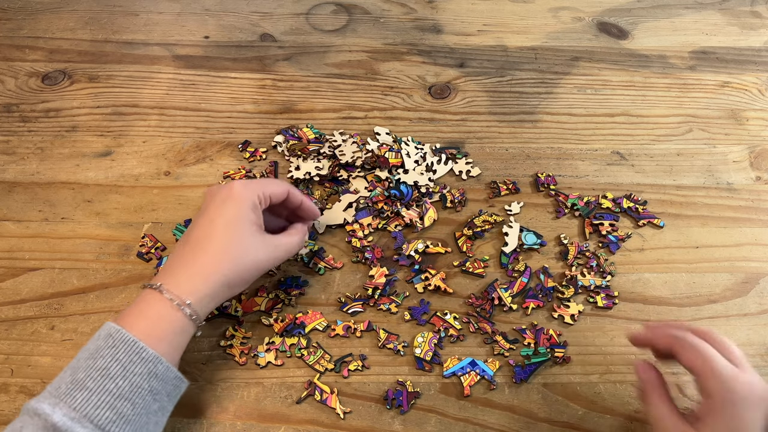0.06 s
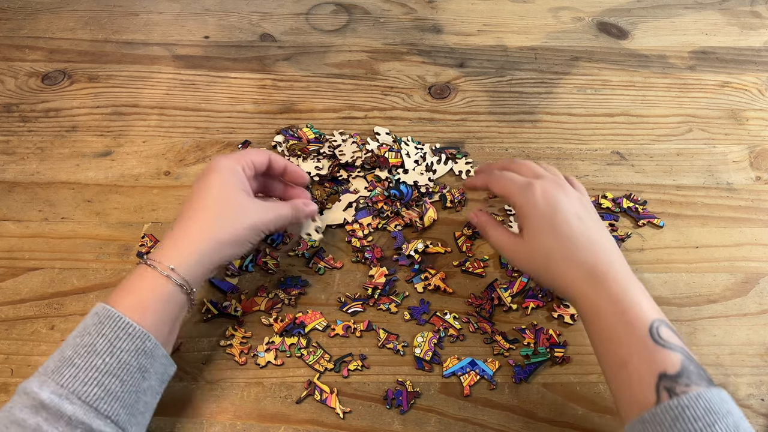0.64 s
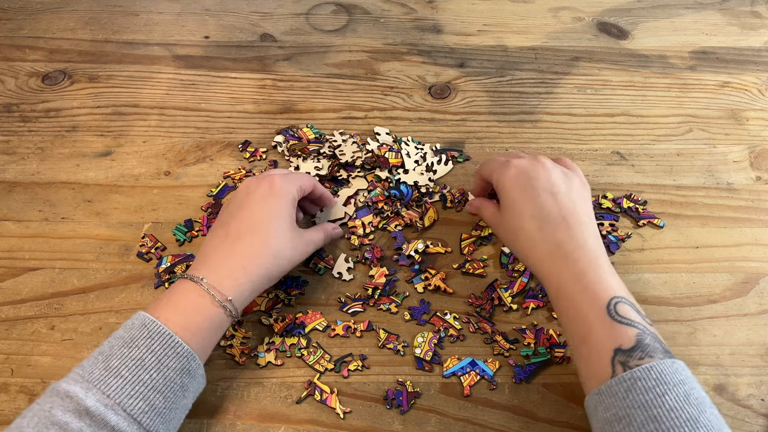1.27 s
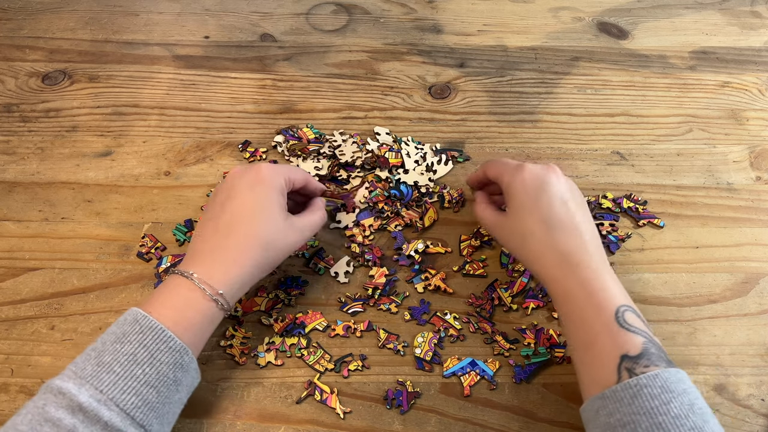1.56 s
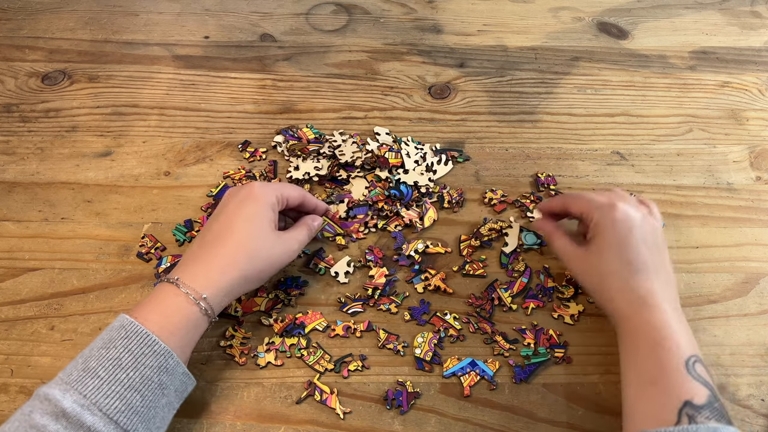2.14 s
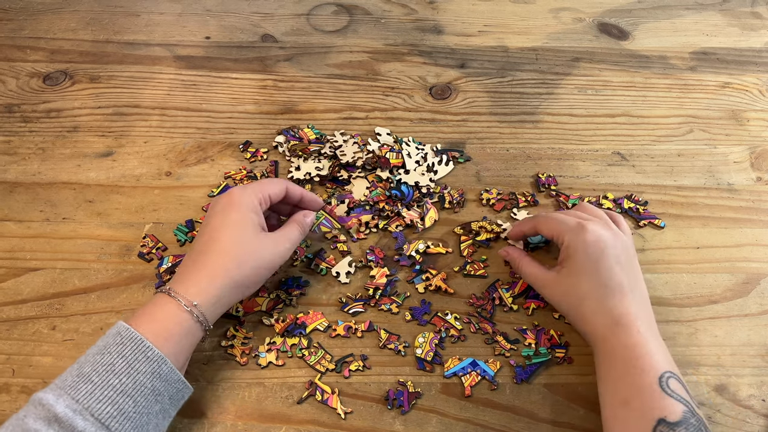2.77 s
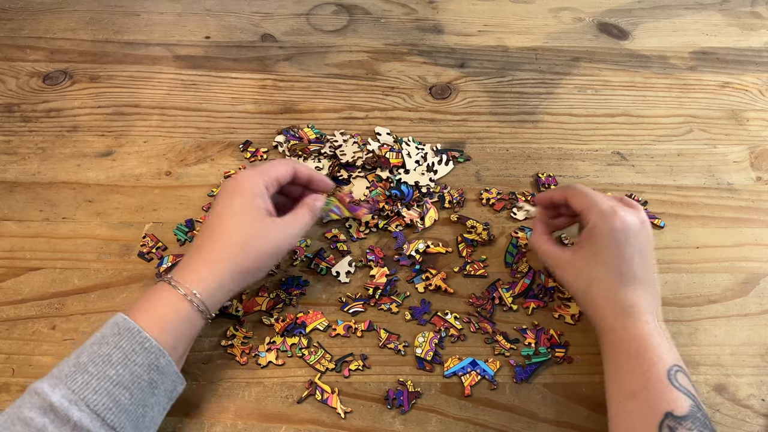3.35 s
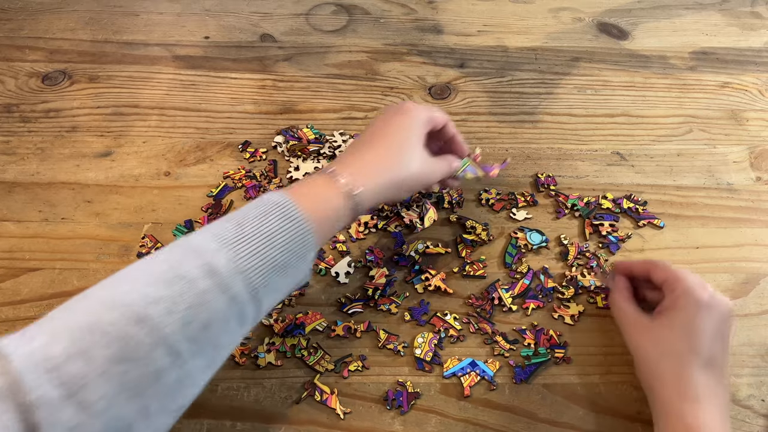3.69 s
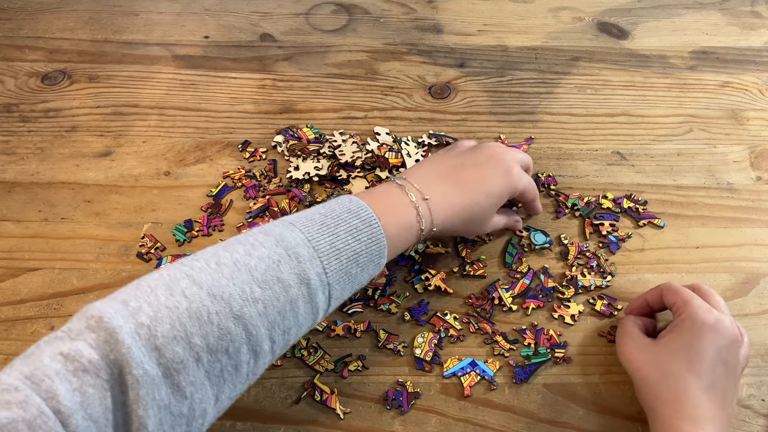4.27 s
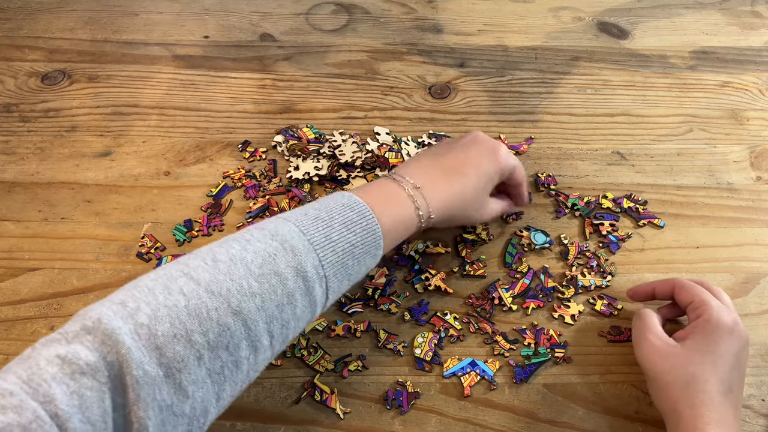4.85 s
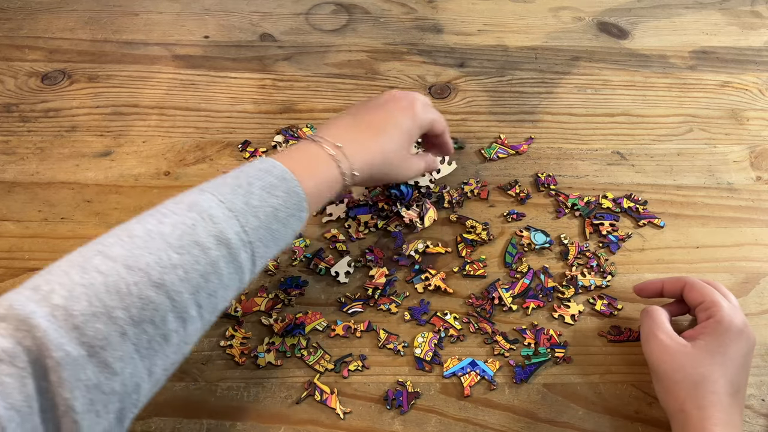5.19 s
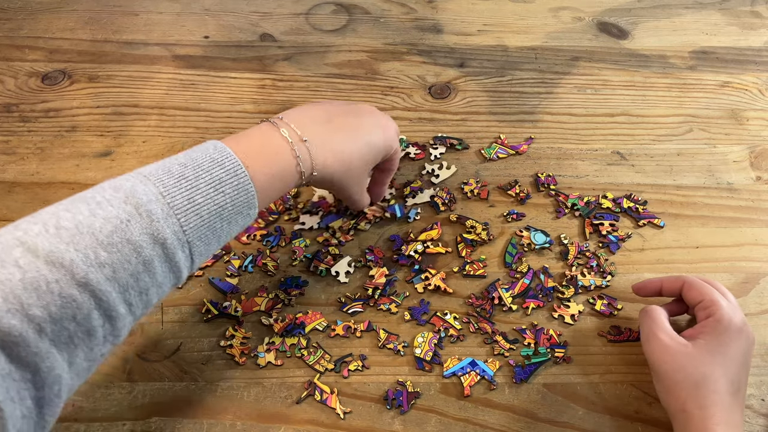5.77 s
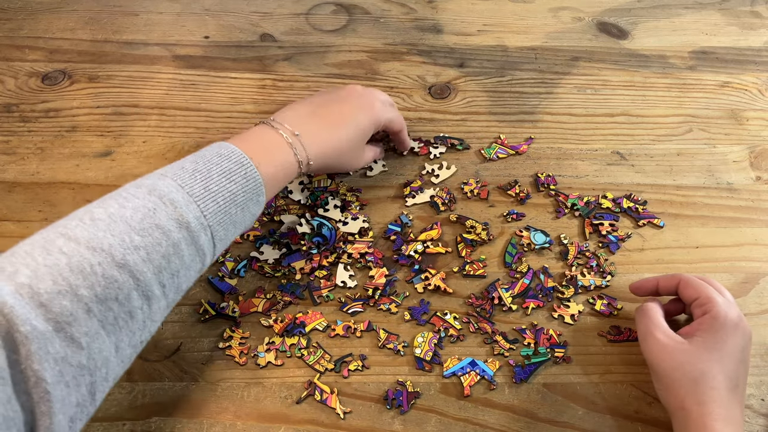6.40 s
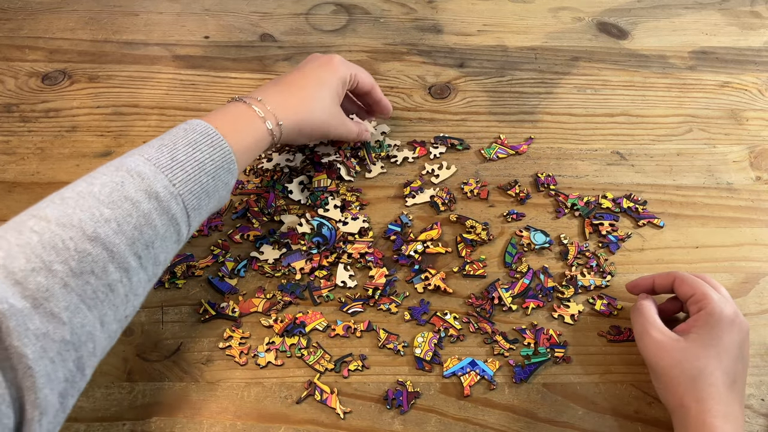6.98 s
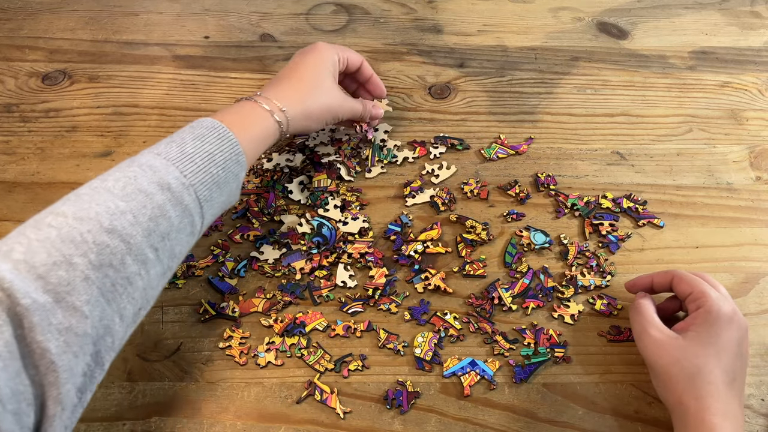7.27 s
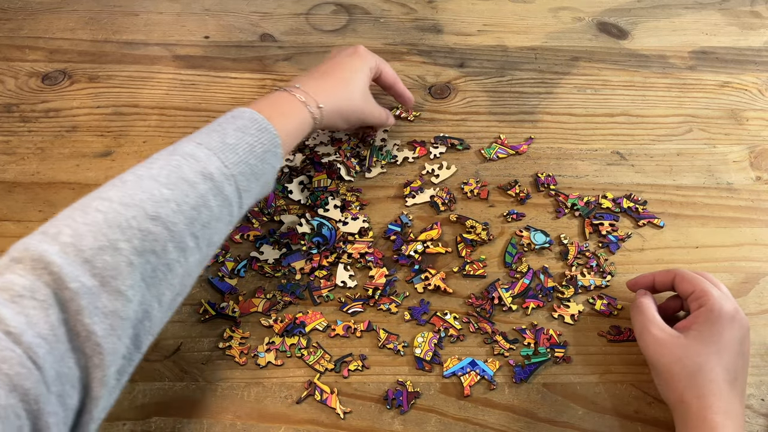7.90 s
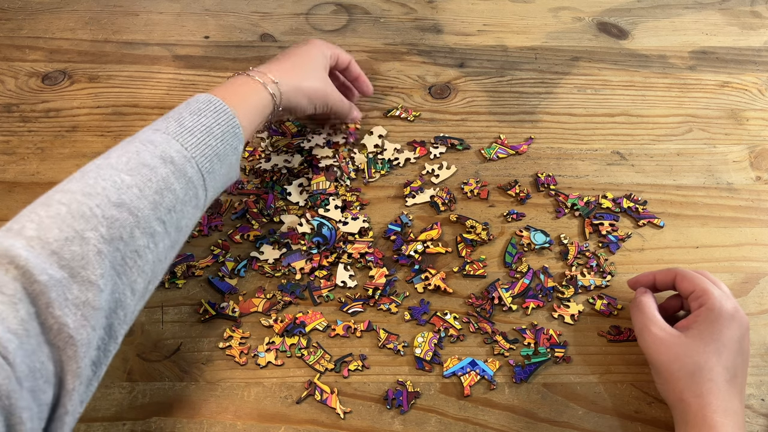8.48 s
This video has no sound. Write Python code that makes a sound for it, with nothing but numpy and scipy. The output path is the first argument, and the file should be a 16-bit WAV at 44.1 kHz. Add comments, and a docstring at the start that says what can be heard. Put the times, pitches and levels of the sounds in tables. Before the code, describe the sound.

Small wooden jigsaw pieces are sorted by hand on a wooden table. A soft sleeve brush opens, followed by dull hand thuds. From about 0.8 to 1.8 seconds the pieces click, ring briefly and scrape as they are pushed. Between 1.8 and 4.4 seconds a sleeve and hand rub across the tabletop, strongest after 3 seconds, with a sharp cluster of clacks near 4. A few faint ringing knocks sound in the background during the first 3.4 seconds. The busiest clattering and gritty sliding comes from 5.3 to 6.4 seconds, with the sharpest click around 5.4. Irregular clicks and short slides continue until about 8.7 seconds. Soft, low thuds of the hands recur throughout and reach the microphone mostly direct. A chain bracelet tinkles very faintly now and then, mainly in the last two seconds. The room is fairly live, with a quiet low hum.

```python
"""A sleeve brushes a wooden table, then small plywood jigsaw pieces click as fingers sort them.
The pieces ring when they collide, knock on the tabletop and scrape in stick-slip as they are pushed.
A chain bracelet tinkles with the wrist; soft thuds of the hands reach the microphone mostly direct.
The room is fairly live, with a low hum and a few faint ringing knocks in the background."""
import sys
import numpy as np
from scipy import signal
from scipy.fft import rfft, irfft
from scipy.io import wavfile

SR = 44100
rng = np.random.default_rng(int(sys.argv[2]) if len(sys.argv) > 2 else 0)


def wrap_up_sound(samples):
    """Save the sound to the file named by the first command line argument, as 16-bit audio."""
    columns = np.atleast_2d(samples).T
    # keep every value between -1 and 1, then stretch to whole-number steps
    tamed = np.clip(columns, -1, 1)
    steps = np.round(tamed * 32767).astype(np.int16)
    wavfile.write(sys.argv[1], SR, steps)


N = 385434
TIME = np.arange(N) / SR
HIT_TIME = TIME[:SR // 8]   # seconds after a contact
ATTACK = SR // 250   # a contact's level is set over its first 4 ms

# Levels in the tables are relative: each source adds its own gain.
# still air of the room: f/Hz, spectral level/dB
AIR_COLOUR = [(12, -38), (20, -13), (53, 2.5), (81, -4), (262, -19), (367, -15.5), (624, -27),
              (1060, -34.5), (1150, -31), (2390, -40), (4670, -39.5), (7950, -49), (12400, -43),
              (13900, -43.5), (16000, -64.5)]
# the room at the microphone: f/Hz, reverberant against direct energy/dB
ROOM_WET = [(100, 2.5), (500, -1), (2000, -5.5), (5000, -7), (7500, -14), (15000, -14.5)]
# faint knocks in the background: t/s, level/dB
KNOCKS = [(0.752, -42), (1.9394, -42), (2.129, -35), (2.325, -45), (2.4906, -38.5), (3.0334, -41),
          (3.3605, -36)]
# resonances of those knocks: f/Hz, width/Hz, level/dB
KNOCK_MODES = [(814, 40, 4.5), (1200, 120, 5.5), (1714, 160, 5), (1903, 64, -0.5), (1896, 42, -2),
               (2868, 28, 7), (2990, 89, 3), (4280, 34, -12), (4470, 400, -4.5), (5740, 120, -8.5)]
# turns of the wrist that stir the bracelet: t/s, swell/s, hold/s, level/dB
WRIST_TURNS = [(1.57, 0.045, 0.057, -63), (4.28, 0.067, 0.092, -63.5), (6.46, .08, 0.24, -67.5),
               (6.97, 0.11, 0.1, -59.5), (7.22, 0.024, 0.58, -70), (8.0, .05, .03, -53.5),
               (8.21, 0.022, 0.09, -64.5), (8.5, 0.055, 0.055, -64)]
# ring of its links: f/Hz, level/dB
LINK_MODES = [(5280, -23), (6800, -2.5), (7000, -1.5), (9900, -5), (10500, -5), (12400, -3.5), (13300, 1),
              (14400, -1.5)]
# sleeve and hand sweeping the table: t/s, swell/s, hold/s, rub/dB, hiss/dB
SWEEPS = [(0.0, 0.0033, 0.2, -51, -56), (0.2, .02, 0.15, -59, -66), (1.83, 0.016, 0.51, -49.5, -53.5),
          (2.49, 0.017, 0.26, -50.5, -60.5), (2.74, 0.088, 0.26, -51.5, -56), (3.11, .1, 0.022, -45, -46),
          (3.31, 0.13, 0.427, -45.5, -51.5), (3.88, 0.026, 0.073, -45, -47.5),
          (4.03, 0.024, 0.29, -49, -70), (4.29, 0.12, 0.023, -47.5, -61.5)]
# hands landing on the table: t/s, level/dB, settled f/Hz
THUDS = [(0.403, -42.5, 121), (0.507, -43, 137), (0.667, -33, 137), (0.694, -39, 107), (0.849, -40.5, 136),
         (1.407, -41, 104), (2.201, -35.5, 140), (2.652, -41.5, 124), (3.699, -32.5, 119),
         (3.905, -30, 144.6), (4.236, -31.5, 146), (4.447, -34.5, 140), (4.784, -35, 139),
         (5.306, -30, 140), (5.67, -32, 150), (6.315, -28, 120), (6.81, -38.5, 144.5), (7.443, -48, 140),
         (7.565, -45.5, 134), (7.779, -35, 77.8), (8.03, -38, 142), (8.233, -40, 148.5)]
# an edge skidding past its neighbour: centre t/s, level/dB, half length/s
SKIDS = [(1.423, -51, 0.0079), (4.944, -46, 0.0044), (6.996, -57, 0.0052), (7.007, -41.5, 0.0048),
         (7.268, -44.5, 0.0025), (7.433, -47.5, 0.0026)]
# ring of jostled pieces: f/Hz
RATTLE_HZ = [3325, 4470, 5300, 5700, 5860, 6720]
# pieces pushed over the table and each other: t/s, swell/s, hold/s, tabletop/dB, edge grit/dB
SLIDES = [(0.838, 0.0078, .03, -41.5, -47), (1.02, 0.097, 0.036, -40, -44.5), (1.2, 0.032, 0.3, -54.5, -69),
          (1.345, 0.039, 0.039, -39.5, -56.5), (1.43, 0.044, 0.038, -42, -44),
          (1.625, 0.012, .01, -44.5, -59), (1.69, 0.016, 0.093, -42.5, -52),
          (4.85, 0.013, 0.025, -47.5, -57), (5.263, 0.029, 0.18, -40, -46.5),
          (5.42, 0.024, 0.052, -35.5, -44), (5.5, 0.018, 0.52, -41.5, -52), (5.62, 0.014, 0.016, -43, -44),
          (5.89, 0.058, 0.023, -36, -32), (6.285, 0.031, 0.029, -36.5, -43),
          (6.36, 0.028, 0.039, -44.5, -51), (6.44, 0.032, 0.1, -48, -61.5),
          (6.795, 0.0093, 0.033, -52, -66), (7.06, .035, 0.059, -56, -64.5),
          (7.425, 0.0073, 0.013, -53, -63), (8.015, 0.015, 0.087, -44, -58), (8.2, 0.017, .12, -52.5, -77),
          (8.435, 0.0081, 0.12, -46, -55), (8.53, .02, 0.061, -55.5, -68)]
# pieces hitting: t/s, low wood/dB, mid clack/dB, high tick/dB, ring f/Hz
CLICKS = [(0.17, -60, -55, -56, 11220), (0.501, -75, -68, -65, 13900), (0.5884, -80, -63.5, -58, 12300),
          (0.7517, -70, -69, -55, 12000), (0.8449, -41, -50, -60, 12020), (0.8714, -46.5, -52, -33.5, 5760),
          (0.89, -55, -54, -36, 5870), (1.1297, -41.5, -41, -40, 5700), (1.4184, -63, -50, -40, 7840),
          (1.461, -42, -48, -45, 7640), (1.5001, -54, -39, -39.5, 7800), (1.519, -64, -55, -36.5, 6040),
          (1.698, -44, -56, -44, 7760), (1.713, -38, -44.5, -36, 12800), (1.7363, -38, -50, -38, 5700),
          (1.7788, -37.5, -37.5, -30.5, 8740), (1.8317, -39, -43.5, -41.5, 7950),
          (2.2098, -60, -63, -41.5, 12500), (2.2554, -41.5, -49, -67, 5660), (2.656, -60, -74, -53, 8700),
          (2.7576, -51.5, -56, -59, 7970), (2.857, -49.5, -63, -66, 6000),
          (3.8735, -29.5, -47, -39.5, 5840), (3.9391, -28.5, -31, -33, 6000), (3.9966, -33, -37, -30, 7940),
          (4.1277, -55, -55, -51.5, 13100), (4.1758, -45, -56, -52, 7800), (4.1909, -60, -50, -50, 5930),
          (4.2328, -48, -55, -59, 7490), (4.6502, -52, -48, -57, 5900), (4.7789, -39.5, -62, -60, 13260),
          (4.783, -45, -42, -52.5, 14990), (4.8853, -48, -50, -49, 12900), (4.8937, -64, -42, -35.5, 13600),
          (5.303, -58, -41.5, -38.5, 5830), (5.318, -50, -43, -56, 5700), (5.3525, -61, -58, -40, 11100),
          (5.372, -59, -46, -34, 5640), (5.3841, -34.5, -37, -26.5, 9800), (5.4368, -37, -32, -31.5, 6960),
          (5.4433, -60, -52, -32, 9900), (5.4476, -40, -34.5, -15, 10320), (5.5135, -62, -40, -36.5, 4470),
          (5.641, -42, -43, -33, 6970), (5.6658, -50, -49, -36.5, 5600), (5.7576, -53, -51, -50, 8400),
          (5.8588, -46, -48, -39, 9600), (5.9416, -42, -44, -27, 13100), (5.9478, -36, -46, -35, 7000),
          (5.962, -43, -39, -42, 6600), (5.9806, -37.5, -34, -41, 5620), (6.3122, -35, -37.5, -29, 8160),
          (6.3263, -38, -48, -33, 8100), (6.3508, -34, -36, -34, 7820), (6.426, -53, -48, -43, 7060),
          (6.8082, -69, -75, -49.5, 7130), (6.833, -66, -62, -45, 6800), (6.8533, -41.5, -50.5, -37, 10800),
          (6.864, -58, -59, -48, 5300), (7.0704, -76, -66, -50, 9700), (7.102, -55, -62, -49.5, 6940),
          (7.2024, -72, -70, -48, 12400), (7.5444, -51, -57, -53, 14320),
          (7.5531, -34, -39.5, -29.5, 13300), (7.5598, -45, -52, -38.5, 5300),
          (7.6116, -43, -46.5, -37.5, 7200), (7.743, -31.5, -34, -39.5, 13600),
          (7.793, -44.5, -46.5, -56, 7300), (7.9144, -36, -40.5, -46, 7640),
          (8.031, -45, -50.5, -43.5, 9000), (8.0535, -43, -49, -38, 6850), (8.1047, -47, -59, -49, 8600),
          (8.1354, -50.5, -56.5, -51, 7300), (8.4456, -43.5, -54, -46, 7900), (8.4535, -52, -50, -40, 5300),
          (8.4936, -38, -39, -31, 7200), (8.5475, -52, -45.5, -47, 14230), (8.5879, -42.5, -53, -65, 13050),
          (8.628, -38.5, -40, -34, 7840), (8.6628, -44, -44, -43.5, 6800)]
# tabletop resonances: f/Hz, width/Hz, level/dB
TABLE_MODES = [(140, 18.5, 10.5), (261.7, 42, -2), (538, 39, 1), (608, 62, -4), (810, 54, 0),
               (916, 37, -23), (1214, 74, -3.5), (1530, 100, -5.5), (1925, 184, 7.5), (2195, 113, 2.5),
               (3190, 210, -16), (3600, 42, -14), (5500, 65, -14)]
# colours of contact and friction: f/Hz, spectral level/dB
WOOD_COLOUR = [(60, -27.5), (200, 1.5), (330, -7), (550, 1.5), (1000, 2.5), (1600, 2.5), (2000, -3),
               (2600, -5.5), (3500, -12.5), (6000, -56.5)]   # knock on the tabletop, mostly below 2500 Hz
CLACK_COLOUR = [(1500, -27), (2600, -1.5), (4000, -2), (5200, -4), (6200, -17), (9000, -24.5)]   # middle of a hit, 2500-5500 Hz
TICK_COLOUR = [(3500, -37), (5600, -3.5), (7000, 5), (10000, 2), (14000, 3), (16000, 3.5)]   # crack of an edge, above 5500 Hz
SCRAPE_COLOUR = [(50, -6.5), (130, 3), (300, 3), (550, 2.5), (850, 0.5), (1100, 2.5), (2000, -6.5),
                 (3500, -9), (5500, -31.5), (8000, -32), (16000, -60.5)]   # tabletop under a sliding piece
GRIT_COLOUR = [(1500, -28.5), (3000, 1.5), (5800, 3.5), (8000, 8), (11000, 4.5), (14000, 4), (16000, -15)]   # edges catching
RUB_COLOUR = [(40, -7), (120, 9), (300, 7.5), (600, 4.5), (1000, 5), (1600, -1.5), (2300, -8.5),
              (3500, -15.5), (6000, -43), (16000, -31)]   # low drag of cloth and skin
HISS_COLOUR = [(1500, -0.5), (3300, 5), (4200, 5), (5200, 0.5), (9000, -4), (13000, -5), (16000, -10)]   # their bright friction


def from_db(db):
    """Decibels to gain."""
    return 10 ** (np.asarray(db) / 20)


def rms_one(x, count=None):
    """Scale so that the first count samples (all by default) have rms 1."""
    return x / np.sqrt(np.mean(x[:count] ** 2) + 1e-20)


def at_hz(points, hz):
    """Read a table on a log-frequency axis."""
    f, value = np.transpose(points)
    return np.interp(np.log(np.maximum(hz, 1)), np.log(f), value)


def decay(t, t60):
    """An envelope that falls by 60 dB in t60 seconds."""
    return np.exp(-np.log(1000) * t / t60)


def add(out, s, sound):
    """Mix a sound in at s seconds."""
    i = max(round(s * SR), 0)
    out[i:i + len(sound)] += sound[:max(N - i, 0)]


def drift(per_s):
    """A random curve of spread near 1 that glides to per_s new values a second."""
    return np.interp(TIME * per_s, np.arange(N // 20), rng.standard_normal(N // 20))


def response(colour, size=4096):
    """The causal (minimum-phase) impulse response of a colour."""
    hz = np.arange(size // 2 + 1) * SR / size
    cepstrum = irfft(np.log(from_db(at_hz(colour, hz))))
    cepstrum[1:size // 2] *= 2
    cepstrum[size // 2 + 1:] = 0
    return irfft(np.exp(rfft(cepstrum)))


def through(x, impulse):
    """Filter by an impulse response."""
    return signal.fftconvolve(x, impulse)[:len(x)]


def resonate(x, hz, width_hz):
    """A resonance with gain 1 at its peak."""
    r = np.exp(-np.pi * width_hz / SR)
    feedback = [1, -2 * r * np.cos(2 * np.pi * hz / SR), r * r]
    return signal.lfilter(np.array([1, 0, -1]) * (1 - r * r) / 2, feedback, x + 1e-18)


def tabletop(colour):
    """The impulse response of a colour with the table's resonances standing out of it."""
    direct = response(colour)
    return direct + sum(from_db(db) * resonate(direct, hz, width) for hz, width, db in TABLE_MODES)


def slips(per_s, spread_db):
    """Tiny catches at random moments; spread_db makes their sizes uneven."""
    sizes = from_db(spread_db * np.minimum(rng.exponential(1, N), 4)) * rng.choice([-1, 1], N)
    return rms_one(sizes * (rng.random(N) < per_s / SR))


def strokes(rows, stop_db_per_s):
    """Each movement gathers speed, holds and dies away; gives one dB curve per level column."""
    power = np.full((len(rows[0]) - 3, N), 1e-12)
    t = TIME[:SR]
    for s, swell_s, hold_s, *levels_db in rows:
        swell = np.minimum(t / swell_s, 1) ** 2
        stop = from_db(-stop_db_per_s * np.maximum(t - swell_s - hold_s, 0))
        for layer, db in zip(power, levels_db):
            add(layer, s, (from_db(db) * swell * stop) ** 2)
    return 10 * np.log10(power)


def room_tone(air_db=-57.5, hum_db=-59.5, hum_hz=58.05, hum_width_hz=5.3):
    """Quiet air around the microphone, with a low wavering hum."""
    air = through(rng.standard_normal(N), response(AIR_COLOUR))
    hum = resonate(rng.standard_normal(N), hum_hz, hum_width_hz)
    hum = resonate(hum, hum_hz, 4 * hum_width_hz)
    return from_db(air_db) * rms_one(air) + from_db(hum_db) * rms_one(hum)


def reverb(x, bass_t60=0.34, dull_hz=30000, first_echo_s=0.0024):
    """Diffuse reflections from one spot; air and walls swallow the treble a little sooner."""
    t, tail = TIME[:SR // 2], 0
    onset = np.clip(t / first_echo_s - 1, 0, 1)
    edges_hz = np.geomspace(70, 18000, 13)
    for low, high in zip(edges_hz, edges_hz[1:]):
        hz = np.sqrt(low * high)
        bandpass = signal.butter(2, [low, high], "band", fs=SR, output="sos")
        band = signal.sosfilt(bandpass, rng.standard_normal(len(t)))
        band = band * decay(t, bass_t60 / (1 + hz / dull_hz)) * onset
        match_direct = np.sqrt(2 * (high - low) / SR / len(t))
        tail = tail + from_db(at_hz(ROOM_WET, hz)) * rms_one(band) * match_direct
    return through(x, tail)


def reflections(x, spots=4):
    """The hands keep moving, and each spot on the table sends its own echoes to the microphone."""
    nearness = np.cos(np.pi * (TIME - np.arange(spots)[:, None] / spots)) ** 4
    return sum(reverb(x * share) for share in np.sqrt(nearness / nearness.sum(0)))


def knocks(gain_db=-9, t60=0.47, rise_s=0.0013):
    """Faint knocks somewhere in the room, with a soft front and a ringing tail."""
    out, t = np.zeros(N), TIME[:SR // 2]
    envelope = decay(t, t60) * (1 - np.exp(-t / rise_s))
    for s, db in KNOCKS:
        push, ringing = rng.standard_normal(len(t)), 0
        for hz, width, mode_db in KNOCK_MODES:
            mode = resonate(resonate(push, hz, width), hz, 8 * width)
            ringing = ringing + from_db(mode_db + rng.normal(0, 0.4)) * mode
        add(out, s, from_db(db + gain_db) * rms_one(ringing * envelope, SR // 25))
    return out


def bracelet(gain_db=-1, width_hz=200):
    """Tiny links touch in clumps as the wrist turns, each with its own pitch."""
    level_db, = strokes(WRIST_TURNS, stop_db_per_s=302)
    links = sum(from_db(db) * resonate(slips(per_s=78, spread_db=4.5), hz, width_hz)
                for hz, db in LINK_MODES)
    highpass = signal.butter(2, 4500, "high", fs=SR, output="sos")
    clumps = from_db(4 * drift(40))
    return from_db(level_db + gain_db) * rms_one(clumps * signal.sosfilt(highpass, links))


def sleeve(rub_gain_db=-4, hiss_gain_db=-2, uneven_db=2, bump_db=-6):
    """Cloth and skin drag with countless fine catches; pieces under the hand bump the table."""
    rub_db, hiss_db = strokes(SWEEPS, stop_db_per_s=234)
    friction = rng.standard_normal((2, N)) * from_db(uneven_db * drift(45))
    bumps = rms_one(through(slips(per_s=260, spread_db=0), tabletop(WOOD_COLOUR)))
    drag = rms_one(through(friction[0], response(RUB_COLOUR)))
    rub = rms_one(drag + from_db(bump_db) * bumps)
    hiss = rms_one(through(friction[1], response(HISS_COLOUR)))
    return from_db(rub_db + rub_gain_db) * rub + from_db(hiss_db + hiss_gain_db) * hiss


def thuds(gain_db=1, t60=0.16, press_s=0.0079, frame_hz=70, frame_db=-7,
          sag=0.49, sag_s=0.0057, skin_db=-19):
    """Soft flesh loads the table slowly and judders as it stops; the pitch sags onto the lowest modes."""
    out, t = np.zeros(N), TIME[:SR // 3]
    skin = response([(40, -8.5), (110, 0), (220, -6), (400, -1), (750, -8), (1500, -31), (6000, -63.5)])
    frame = from_db(frame_db) * np.sin(2 * np.pi * frame_hz * t)
    envelope = (1 - np.exp(-t / press_s)) * decay(t, t60)
    for s, db, hz in THUDS:
        cycles = hz * (t + sag * sag_s * (1 - np.exp(-t / sag_s)))
        judder = from_db(skin_db) * rms_one(through(rng.standard_normal(len(t)), skin))
        swing = np.sin(2 * np.pi * cycles) + frame + judder
        add(out, s - .004, from_db(db + gain_db) * swing * envelope)
    return out


def skids(clack_db=-11):
    """A quick slip swells and fades as a bright chip of noise, with a little of the piece's clack."""
    level = sum(from_db(db) * np.exp(-np.minimum(((TIME - s) / half_s) ** 2, 20))
                for s, db, half_s in SKIDS)
    friction = rng.standard_normal(N)
    tick = rms_one(through(friction, response(TICK_COLOUR)))
    clack = rms_one(through(friction, response(CLACK_COLOUR)))
    return level * (tick + from_db(clack_db) * clack)


def rattle(grit_db, gain_db=-6, width_hz=130):
    """Pushed pieces tip over their neighbours and ping; the harder the push, the louder."""
    pings = sum(resonate(slips(per_s=24, spread_db=0), hz, width_hz) for hz in RATTLE_HZ)
    return from_db(grit_db + gain_db) * rms_one(pings)


def sliding(table_db, grit_db, table_gain_db=-5, grit_gain_db=-4, ring_db=-2, judder_db=3, pieces=16):
    """Pieces stick and slip: each catch drives the tabletop and rings one of the pieces."""
    catches = slips(per_s=3200, spread_db=2) * from_db(judder_db * drift(110))
    touched = rng.integers(0, pieces, N)
    pitches_hz = np.r_[5850, 6950, np.geomspace(4300, 14500, pieces - 2)]
    rings = sum(resonate(catches * (touched == k), hz, width_hz=96) * from_db(5.6 * drift(13))
                for k, hz in enumerate(pitches_hz))
    grit = rms_one(through(catches, response(GRIT_COLOUR)))
    edges = rms_one(grit + from_db(ring_db) * rms_one(rings))
    scrape = rms_one(through(catches, tabletop(SCRAPE_COLOUR)))
    return from_db(table_db + table_gain_db) * scrape + from_db(grit_db + grit_gain_db) * edges


def contact(crack_t60, tail_t60, tail_db, rise_s):
    """A rough edge bites in a short crack, and the dense modes of the wood ring on."""
    envelope = decay(HIT_TIME, crack_t60) + from_db(tail_db) * decay(HIT_TIME, tail_t60)
    return rng.standard_normal(len(HIT_TIME)) * envelope * (1 - np.exp(-HIT_TIME / rise_s))


def piece_ring(hz, others=4, others_db=-8, cycles=130):
    """A piece has a leading mode and weaker ones set by its outline; all last equally many cycles."""
    modes_hz = np.r_[hz, rng.uniform(6500, 14800, others)][:, None]
    strengths = np.r_[1, from_db(others_db) * rng.normal(0, .7, others)]
    return strengths @ (np.sin(2 * np.pi * modes_hz * HIT_TIME) * decay(HIT_TIME, cycles / modes_hz))


def with_rebounds(hits, usual_delay_s=.007, rebound_db=-8, ceiling_db=-49):
    """A struck piece rocks back and touches once more, weaker, a few milliseconds later."""
    touches = list(hits)
    for s, *levels_db, hz in hits:
        delay_s = usual_delay_s * rng.uniform(.5, 1.5)
        weaker_db = np.minimum(np.array(levels_db) + rebound_db, ceiling_db)
        touches.append((s + delay_s, *weaker_db, hz))
    return touches


def clicks(wood_gain_db=-1.5, crack_db=-3, ring_db=-4, ring_growth=0.31, firm_db=-32, lag_s=0.00061):
    """Each hit cracks, rings the piece and then shakes the tabletop; hard hits ring more purely."""
    out = np.zeros(N)
    wood, clack, tick = tabletop(WOOD_COLOUR), tabletop(CLACK_COLOUR), response(TICK_COLOUR)
    for s, wood_db, clack_db, tick_db, hz in with_rebounds(CLICKS):
        body = through(contact(crack_t60=0.025, tail_t60=0.062, tail_db=-15, rise_s=0.00086), wood)
        plate = through(contact(crack_t60=0.011, tail_t60=0.17, tail_db=-14.5, rise_s=0.0008), clack)
        crack = through(contact(crack_t60=0.005, tail_t60=0.041, tail_db=-10, rise_s=0.00005), tick)
        purity_db = ring_db + ring_growth * (tick_db - firm_db)
        ring = from_db(purity_db) * rms_one(piece_ring(hz), ATTACK)
        piece = from_db(crack_db) * rms_one(crack, ATTACK) + ring
        add(out, s, from_db(tick_db) * rms_one(piece, ATTACK))
        add(out, s, from_db(clack_db) * rms_one(plate, ATTACK))
        add(out, s + lag_s, from_db(wood_db + wood_gain_db) * rms_one(body, ATTACK))
    return out


def scene(thud_room_db=-7):
    """The table and the room at one microphone; the thuds arrive mostly direct."""
    table_db, grit_db = strokes(SLIDES, stop_db_per_s=297)
    pieces = clicks() + skids() + sliding(table_db, grit_db) + rattle(grit_db)
    table = pieces + sleeve() + bracelet()
    hands = thuds()
    room = reflections(table + from_db(thud_room_db) * hands)
    return (table + hands + room + knocks() + room_tone())[None]


def record(dry, low_cut_hz=28, high_cut_hz=15750):
    """The microphone drops the deepest bass; the top is cut steeply."""
    low_cut = signal.butter(6, low_cut_hz, "high", fs=SR, output="sos")
    high_cut = signal.ellip(10, .1, 80, high_cut_hz, fs=SR, output="sos")
    return signal.sosfilt(high_cut, signal.sosfilt(low_cut, dry))


dry = scene()
out = record(dry)
wrap_up_sound(out)
```